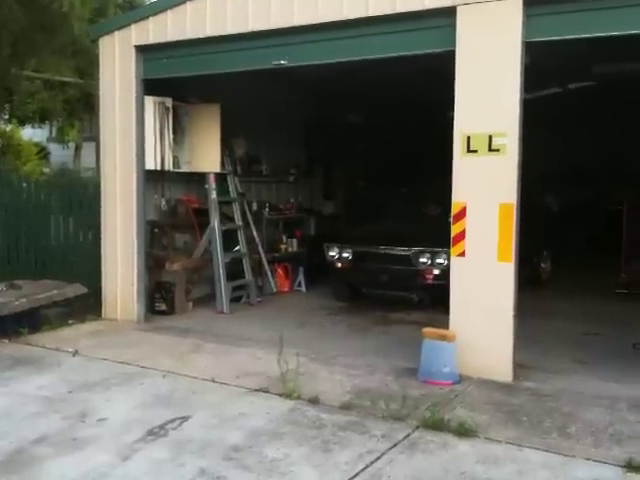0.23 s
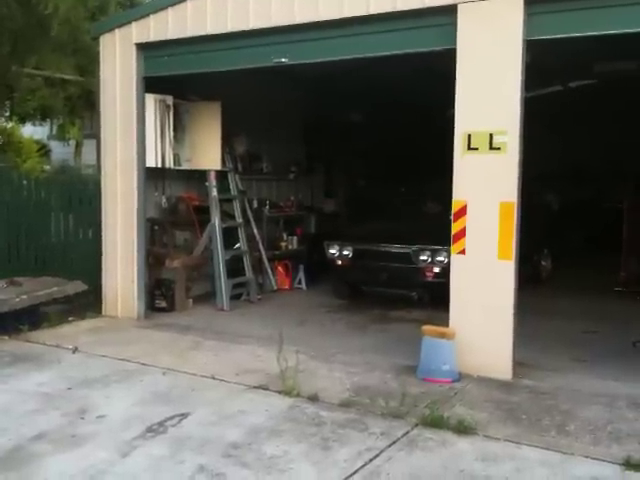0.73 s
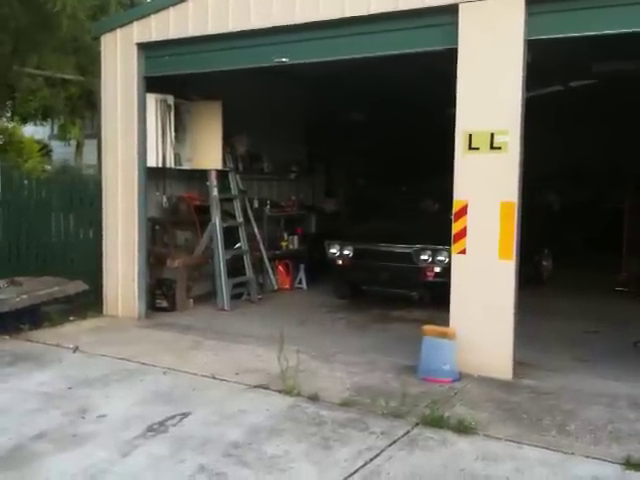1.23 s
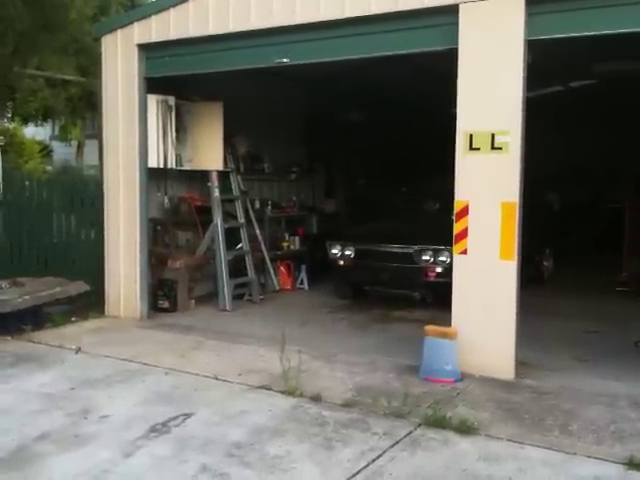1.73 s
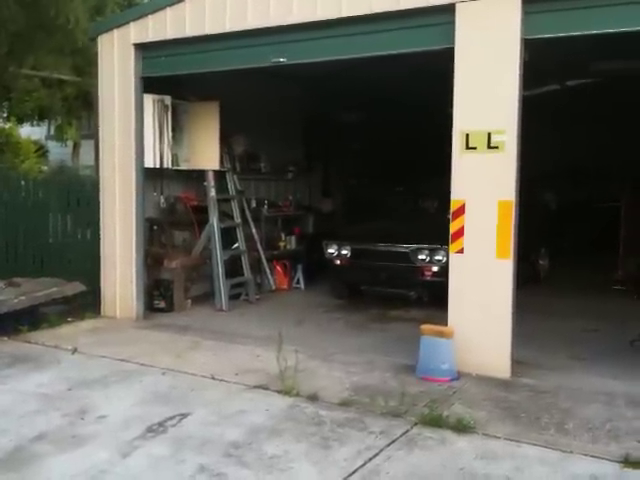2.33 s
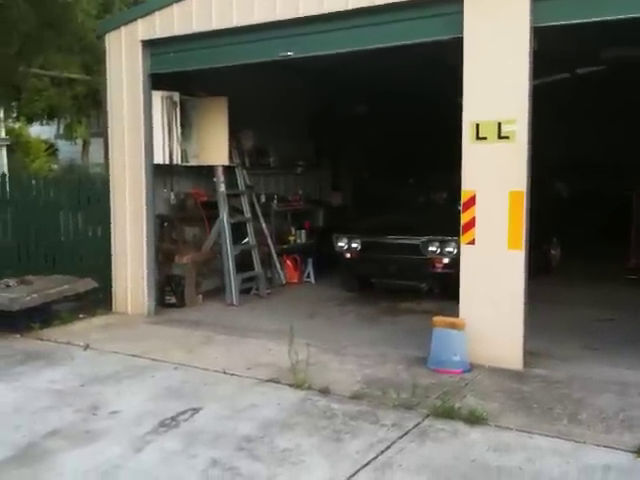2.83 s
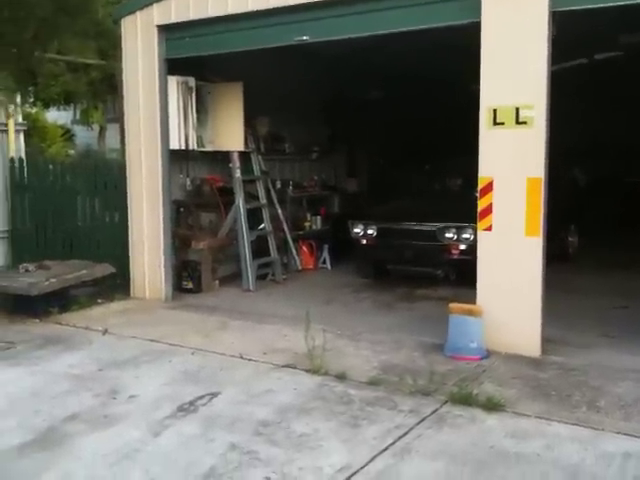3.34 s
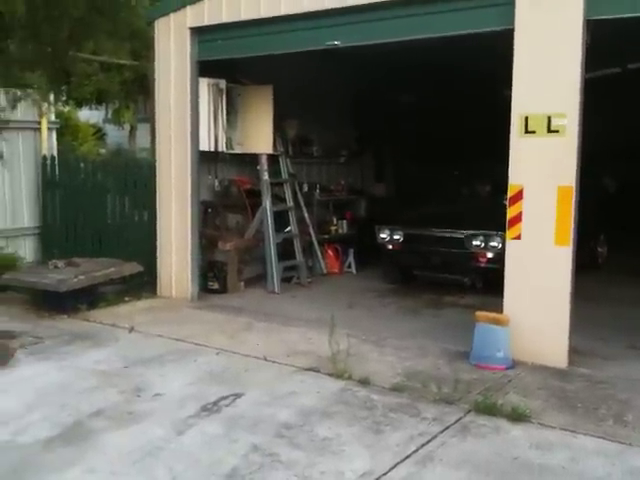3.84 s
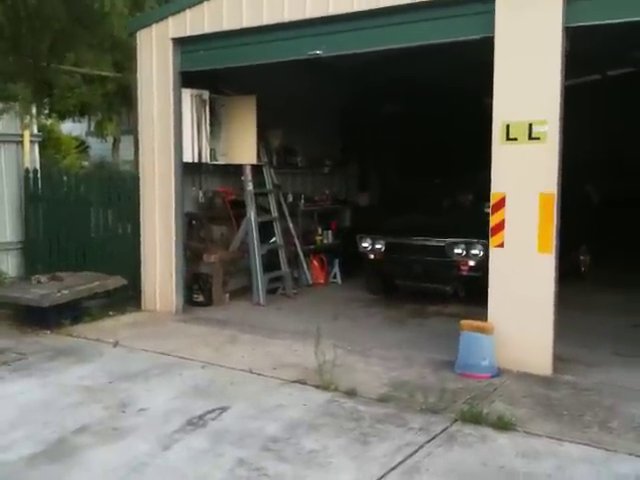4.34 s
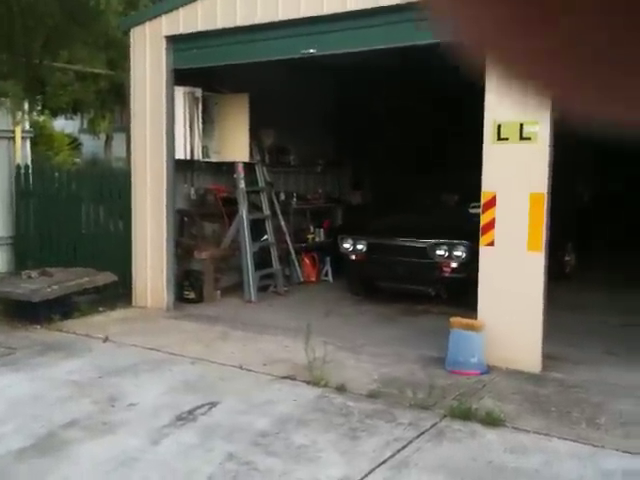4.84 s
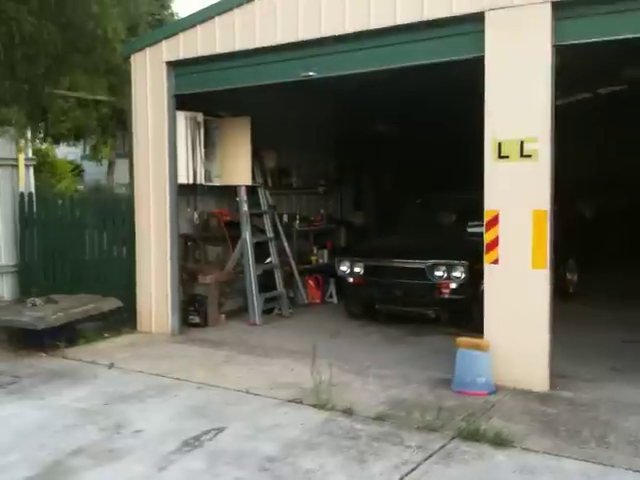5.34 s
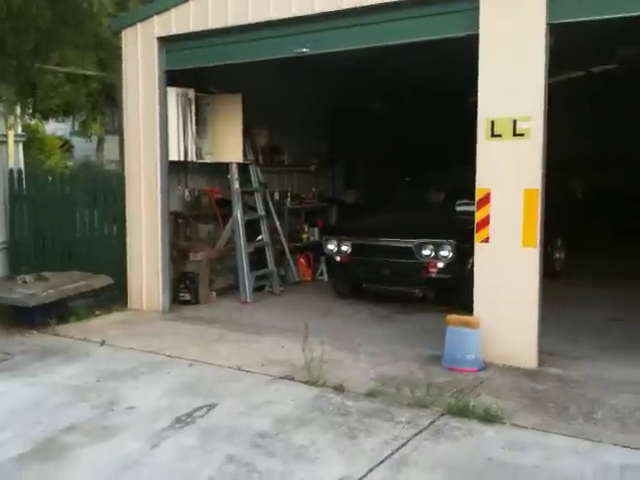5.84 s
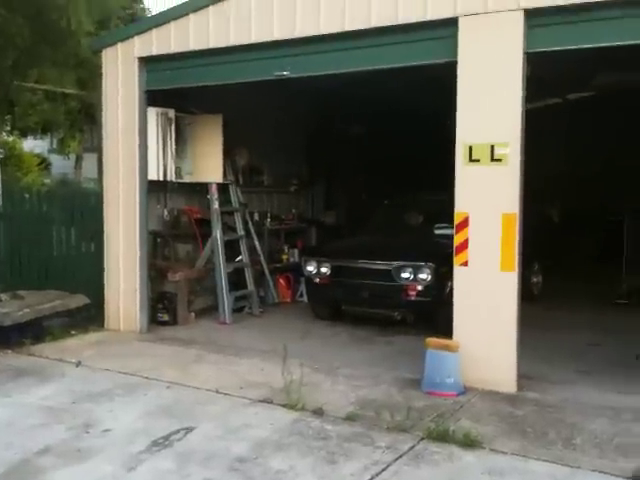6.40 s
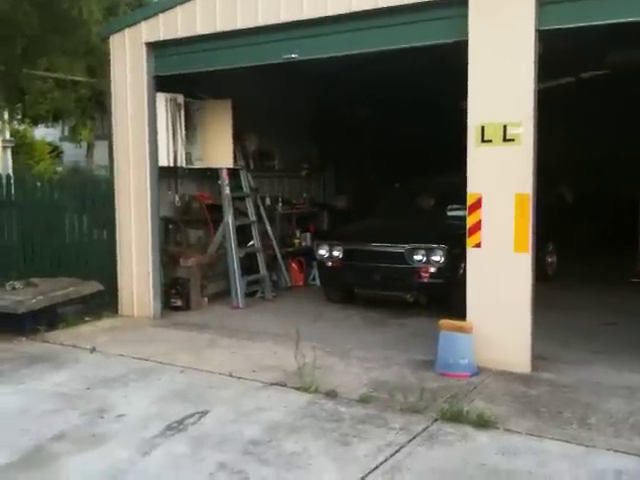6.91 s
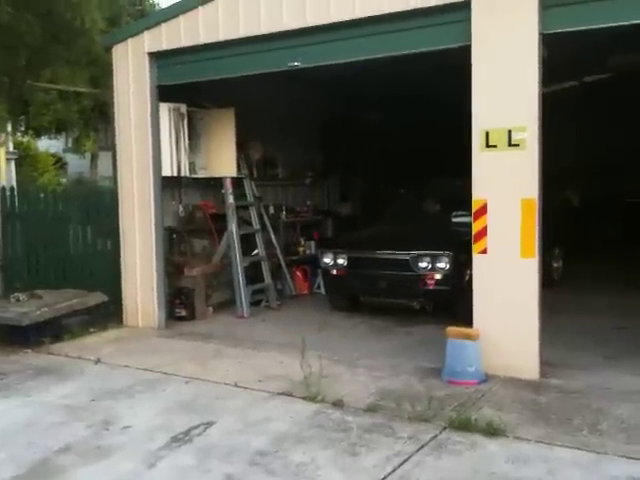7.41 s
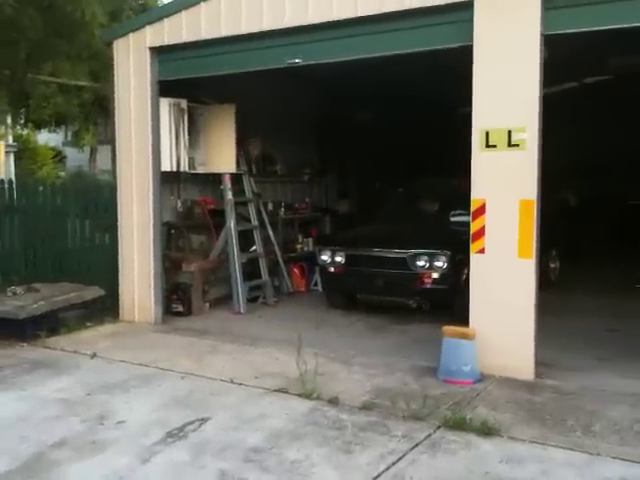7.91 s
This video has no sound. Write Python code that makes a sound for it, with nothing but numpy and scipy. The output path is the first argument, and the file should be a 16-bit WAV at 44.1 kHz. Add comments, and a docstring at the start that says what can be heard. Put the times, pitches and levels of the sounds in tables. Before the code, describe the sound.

Uneven booming exhaust pops ring off steel walls, cut out to quiet, then switch clicks, a whining starter and a harsh, rasping restart.

```python
"""A loud rotary engine idles unevenly inside a steel shed, heard from the driveway: each firing rings low exhaust modes
and sends bursts of noise round the walls, with weak misfires between. It stalls, a pump whirs with rushing noise and
unsteady tones, and small bumps are heard. A switch clicks with short noise bursts, then the starter clunks and cranks
with wavering gear partials and noise while the exhaust puffs, and the engine fires again with extra rasp.
A quiet bed of coloured noise, the yard, lies under it all."""
import sys
import numpy as np
from scipy import signal
from scipy.fft import rfft, irfft, next_fast_len
from scipy.io import wavfile
from scipy.ndimage import uniform_filter1d, map_coordinates

SR = 44100
rng = np.random.default_rng(int(sys.argv[2]) if len(sys.argv) > 2 else 0)


def natural_amplitude(level_db):
    """Convert a level in decibels to a linear amplitude factor, elementwise."""
    exponent = np.asarray(level_db, float) / 20
    return 10 ** exponent


def inscribe(sig):
    """Save sig as 16-bit PCM at rate SR to the path in sys.argv[1].

    A 1-D sig is mono; a 2-D sig holds one channel per row.
    Samples are clipped to [-1, 1] before scaling.
    """
    pcm = np.round(np.clip(np.atleast_2d(sig).T, -1, 1) * 32767)
    wavfile.write(sys.argv[1], SR, pcm.astype(np.int16))


N = 359856  # length in samples
TIME = np.arange(N) / SR  # seconds
STROKE_RATE = 8.6  # strokes a second while cranking


def unit(x):
    """Scales a sound to rms 1."""
    return x / np.sqrt(np.mean(x ** 2) + 1e-20)


def along(points, hz):
    """Reads a curve of (Hz, value) points on a log frequency axis."""
    f, value = np.transpose(points)
    return np.interp(np.log(hz + 1), np.log(f + 1), value)


def curves(rows):
    """One value per sample for each column, and a mask of the time the rows cover."""
    s, *columns = np.transpose(rows)
    covered = (TIME > s[0]) & (TIME < s[-1])
    return [np.interp(TIME, s, column) for column in columns] + [covered]


def wobble(rate):
    """A smooth random curve through a number of random knots a second."""
    knots = rng.standard_normal(int(N * rate / SR) + 4)
    return map_coordinates(knots, [np.arange(N) * rate / SR])


def coloured(x, spectrum):
    """Filters a sound by a gain curve of (Hz, dB) points."""
    m = next_fast_len(N + 8192)
    gain = natural_amplitude(along(spectrum, np.fft.rfftfreq(m, 1 / SR)))
    return irfft(rfft(x, m) * gain, m)[:N]


def noise(spectrum):
    """Steady coloured noise of rms 1."""
    return unit(coloured(rng.standard_normal(N), spectrum))


def patchy(spectrum, depth_db, size):
    """Coloured noise of rms 1 whose gain wanders in patches of size (bins, frames)."""
    z = signal.stft(rng.standard_normal(N), nperseg=1024)[2]
    field = uniform_filter1d(rng.standard_normal(z.shape), size[0], 0)
    field = uniform_filter1d(field, size[1], 1)
    uneven = signal.istft(z * natural_amplitude(depth_db * unit(field)), nperseg=1024)[1][:N]
    return unit(coloured(uneven, spectrum))


def spikes(times, db):
    """One impulse for each event."""
    return np.bincount(np.round(times * SR).astype(int), natural_amplitude(db), N)


def fading(x, t60, rise):
    """Every impulse becomes a quick rise and an exponential fall (60 dB in t60 seconds)."""
    t = np.arange(SR) / SR
    return signal.fftconvolve(x, natural_amplitude(-60 * t / t60) * (1 - np.exp(-t / rise)))[:N]


def swell(times, db, t30, rise):
    """Envelope of turbulence (falls 30 dB in t30 seconds): pulses are unrelated, so their powers add."""
    power = fading(spikes(times, 2 * db), t30, rise)
    return np.sqrt(np.abs(power))


def ringing(modes, rise):
    """Decaying sines from (Hz, amplitude, t60) rows; a negative mode starts by pulling."""
    t = np.arange(SR // 2) / SR
    sines = sum(size * natural_amplitude(-60 * t / t60) * np.sin(2 * np.pi * hz * t) for hz, size, t60 in modes)
    return (1 - np.exp(-t / rise)) * sines


def resonant(x, peaks):
    """Filters a sound by (Hz, width, dB) resonances, alternating in sign."""
    m = next_fast_len(N + SR // 2)
    f = np.fft.rfftfreq(m, 1 / SR)
    response = sum((-1) ** k * natural_amplitude(db) * 1j * f * width / (hz * hz - f * f + 1j * f * width)
                   for k, (hz, width, db) in enumerate(peaks))
    return irfft(rfft(x, m) * response, m)[:N]


# how long the shed rings on: (frequency [Hz], t60 [s])
SHED = [(100, 0.73), (200, 0.69), (1000, 0.48), (2500, 0.63), (5000, 0.74), (13000, 0.13)]


def shed(x):
    """Diffuse answer of the steel walls: a delayed noise tail, each frequency dying at its own speed."""
    hz, t, z = signal.stft(rng.standard_normal(SR), SR, nperseg=256)
    tail = signal.istft(z * natural_amplitude(-60 * t / along(SHED, hz)[:, None]), SR, nperseg=256)[1]
    delayed = np.pad(x, (500, 0))  # samples
    return signal.fftconvolve(delayed, tail / np.linalg.norm(tail))[:N]


# chambers that fire: (time [s], boom [dB], sharpness of bark and crack [dB])
FIRINGS = [(0.002, 4, -7.5), (0.057, -0.5, -13), (0.183, 3, -12), (0.214, 1.5, -17), (0.275, 1.5, -14),
           (0.305, 3, -11), (0.332, -2.5, -14.5), (0.56, 0.5, -14), (0.592, 0, -17), (0.655, -0.5, -16),
           (0.684, 3, -9), (0.711, -3, -7.5), (0.756, -9, -12.5), (0.792, 2, -12.5), (0.946, 2, -14.5),
           (1.011, 0.5, -16.5), (1.067, 0.5, -19), (1.089, 3.5, -13), (1.116, -2, -10), (1.159, 0.5, -8.5),
           (1.322, 1.5, -15.5), (1.388, -4, -15), (1.419, 0.5, -11.5), (1.447, 2, -11.5), (1.504, 0, -13.5),
           (1.662, 4, -11.5), (1.731, -0.5, -10), (1.761, -0.5, -13.5), (1.823, 1.5, -15),
           (1.884, 4, -14.5), (1.975, 3, -10.5), (2.041, 1, -10), (2.106, 3.5, -11.5), (2.138, -6.5, -13),
           (2.198, 3, -14.5), (2.259, 0.5, -15), (2.351, -3.5, -30), (2.422, -0.5, -15), (2.493, 1.5, -12),
           (2.527, -0.5, -14.5), (2.593, 0.5, -18.5), (2.657, 1.5, -14.5), (2.717, 0.5, -17),
           (2.748, 3, -9), (2.81, 2.5, -10), (2.874, 1, -15), (2.981, -2.5, -20), (3.051, 1.5, -17.5),
           (3.118, -4.5, -15), (3.149, 4, -12.5), (3.213, 1, -8.5), (3.279, -1, -15.5), (3.383, 1, -18.5),
           (3.451, -1, -16), (3.516, 1.5, -16), (3.599, 2.5, -11), (3.65, -5, -16), (3.721, 2, -15),
           (3.756, -0.5, -11), (3.861, 1.5, -19), (3.932, 3, -14), (4.004, -2.5, -16.5), (4.039, 0.5, -12),
           (4.109, 3.5, -11), (4.333, -11.5, -27), (4.382, -11.5, -17), (6.983, -23.5, -52),
           (7.051, -16, -42), (7.104, -11.5, -36.5), (7.152, -7.5, -28), (7.242, -1, -16),
           (7.355, 2.5, -19), (7.387, 2.5, -12.5), (7.449, 4.5, -13.5), (7.476, 4.5, -11),
           (7.502, -0.5, -11), (7.529, 3.5, -21), (7.553, -0.5, -13), (7.578, -0.5, -10.5),
           (7.652, -3, -28.5), (7.723, -9.5, -31), (7.79, -11, -36.5), (7.891, -13, -40.5),
           (7.924, -3.5, -24), (7.956, 0.5, -18.5), (7.991, 0.5, -15.5), (8.022, 2, -14.5), (8.081, 2, -14),
           (8.14, 0.5, -14)]
# chambers that miss and only puff: (delay after a firing [s], loss of boom [dB], loss of sharpness [dB])
MISFIRES = [(0.035, 9.4, 6.7), (0.08, 10, 17)]


def pulses():
    """Times and boom, bark and crack dB of firings, of the misfires behind them and of the cranking puffs."""
    clear_s, stall_s = 0.04, 0.3  # room a puff needs before the next firing; a longer pause is a stall
    s, boom_db, sharp_db = np.transpose(FIRINGS)
    pause = np.diff(s, append=0)
    rows = [np.array([s, boom_db, sharp_db])]
    for delay, boom_loss_db, sharp_loss_db in MISFIRES:
        chance = rng.standard_normal((len(s), 2))
        puff_s = s + delay + 0.003 * chance[:, 0]
        puff_db = boom_db - boom_loss_db + 2 * chance[:, 1]
        missed = np.array([puff_s, puff_db, sharp_db - sharp_loss_db])
        rows.append(missed[:, (pause > delay + clear_s) & (pause < stall_s)])
    crank = 6.44 + np.arange(5) / STROKE_RATE  # five puffs, one a stroke
    rows.append(np.array([crank, -29.5 + 0 * crank, -49.5 + 0 * crank]))
    s, boom_db, sharp_db = np.hstack(rows)
    scatter_db = 1.5 * rng.standard_normal(len(s))  # shifts the balance of bark and crack
    return s, boom_db, sharp_db - 0.82 + scatter_db, sharp_db + 0.63 - scatter_db


# exhaust and shed ringing after each pulse: (frequency [Hz], amplitude, t60 [s])
PIPE = [(108, .03, .5), (120, -.08, .105), (165, -.38, .108), (176, 1.2, .085), (197, -.14, .3),
        (233, .31, .19), (261, -.36, .13), (287, -.34, .066), (308, -.13, .21)]


def exhaust_boom(s, boom_db):
    """Each push of gas rings the same low modes, but no two pulses excite them alike."""
    scatter_db = 1.2 * rng.standard_normal((len(s), len(PIPE)))
    return sum(signal.fftconvolve(spikes(s, boom_db + db), ringing([mode], rise=0.0076))[:N]
               for mode, db in zip(PIPE, scatter_db.T))


# sheet-metal resonances: (frequency [Hz], width [Hz], level [dB])
PANELS = [(339, 13, -9), (438.2, 12, 4.5), (488.6, 18, -3), (627, 19, -2.5), (693.4, 26, 6), (721, 21, -3),
          (843, 6.3, -6), (864, 44, 1.5), (975, 15, -2), (1106, 46, -2), (1273, 30, -0.5), (1400, 65, -2),
          (1522, 69, -0.5), (1610, 21, 4), (1722, 27, -3), (1840, 20, 0), (1977, 7.7, -11), (2075, 30, -8),
          (2223, 18, 0), (2127, 30, -3), (2390, 30, -6), (2870, 81, -14.5)]
# colour of the lower bark: (frequency [Hz], level [dB per Hz])
BARK = [(190, -28), (330, -3), (478, -3), (567, -4.5), (693, -2), (878, 1.5), (1030, -6.5), (2170, -12),
        (3200, -26.5), (4160, -47.5), (7040, -120)]


def sheet_metal_bark(s, bark_db):
    """A sharp blast shakes the sheet metal at its resonances, over a slower burst of rough noise."""
    blast = swell(s, bark_db, t30=0.033, rise=0.00065) * rng.standard_normal(N)
    blast = blast + natural_amplitude(18.5) * spikes(s, bark_db)
    rough = swell(s, bark_db, t30=0.11, rise=0.0062) * patchy(BARK, depth_db=2.5, size=(4, 4))
    return natural_amplitude(15) * resonant(blast, PANELS) + natural_amplitude(-1.5) * rough


# colour of the gas crack: (frequency [Hz], level [dB per Hz])
CRACK = [(1410, -7), (2400, -5.5), (3160, -9.5), (3940, -6), (4800, -1), (6850, -5.5), (7710, -3.5),
         (9390, -9), (12400, -14), (15800, -23.5)]


def gas_crack(s, crack_db):
    """Spat gas makes a sudden jet of hiss, and a slower sizzle that piles up in the shed."""
    jet = natural_amplitude(-2.5 + 2.4 * wobble(400)) * swell(s, crack_db, t30=0.066, rise=0.00027) * noise(CRACK)
    sizzle = swell(s, crack_db, t30=0.25, rise=0.023) * patchy(CRACK, depth_db=2.5, size=(14, 4))
    sizzle = natural_amplitude(-1.5 + 1.4 * wobble(50)) * sizzle
    late = s > 7  # after the restart the crack carries extra rasp near 3 kHz
    rasp = noise([(2000, -30), (2600, -3), (3100, 0), (3700, -5), (4500, -30)])
    jet = jet + swell(s[late], crack_db[late] - 9.5, t30=0.12, rise=0.003) * rasp
    return jet, sizzle


def exhaust():
    """Each pulse booms, barks and cracks, straight from the exhaust and again off the shed walls."""
    s, boom_db, bark_db, crack_db = pulses()
    boom = exhaust_boom(s, boom_db)
    front = s + 0.001  # the sharp front follows the first push of gas
    bark = sheet_metal_bark(front, bark_db)
    jet, sizzle = gas_crack(front, crack_db)
    direct = natural_amplitude(1) * boom + bark + jet + sizzle
    boom_echo = natural_amplitude(-8.5) * shed(boom * natural_amplitude(4.3 * wobble(40)))
    return direct + boom_echo + natural_amplitude(-0.5) * shed(bark) + natural_amplitude(-1.5) * shed(jet)


# mean tooth rate of the gears: (time [s], rate [Hz])
GEAR = [(6.29, 422), (6.45, 452), (6.65, 482.5), (6.9, 493.5), (7.2, 505)]
# partials of the whine: (multiple of the tooth rate, level [dB])
WHINE = [(1, -10.5), (2, -3), (3, 6.5), (4, -1), (5, -5), (6, 2.5), (7, -1)]


def gear_whine(stroke, start_s):
    """Meshing teeth give wavering partials; each compression slows and loads the gears: sag and swell."""
    hz = curves(GEAR)[0] * (1 + 0.0296 * np.cos(stroke) + 0.00595 * wobble(30))
    turn = 2 * np.pi * np.cumsum(hz) / SR
    partials = sum(natural_amplitude(db + 8 * wobble(30)) * np.sin(k * turn + 0.44 * wobble(150)) for k, db in WHINE)
    load = natural_amplitude(7 * np.sin(stroke) - 6)
    since = TIME - start_s
    rise = np.clip(since / 0.1, 0, 1)
    return natural_amplitude(-45 - 9 * since) * rise * load * partials  # fades 9 dB a second as the gears unload


# pinion blows as it clunks home: (time [s], level [dB])
PINION = [(6.3, -10), (6.306, -9), (6.311, -4.5), (6.319, 5), (6.325, -5)]
# ringing of the pinion clunk: (frequency [Hz], amplitude, t60 [s])
CLUNK = [(238.5, 0.034, 0.079), (664, 0.028, 0.065), (787, 0.042, 0.051), (1437, 0.042, 0.077),
         (1720, 0.039, .05), (2140, 0.054, 0.045), (2260, 0.049, .05), (3070, 0.017, 0.037),
         (5330, 0.031, 0.033), (5480, .025, .03), (6200, .015, 0.022)]


def pinion():
    """Each blow rings the metal of the pinion and adds a short crunch of noise."""
    s, db = np.transpose(PINION)
    clunk = signal.fftconvolve(spikes(s, db), ringing(CLUNK, rise=0.0029))[:N]
    grit = noise([(500, -24.5), (1400, 6), (2400, -2), (3500, -28), (5300, 4.5), (9000, -18)])
    return clunk + swell(s, db - 27, t30=0.049, rise=0.00091) * grit


# loudness of the starter motor: (time [s], grind and chuff before a 1 dB cut [dB], drone [dB])
STARTER = [(6.29, -58, -80), (6.31, -31, -80), (6.38, -46.5, -80), (6.43, -35.5, -69.5), (6.64, -37, -59),
           (7.02, -40, -61), (7.2, -32.5, -36)]
# colour of the grind: (frequency [Hz], level [dB per Hz])
GRIND = [(200, -41), (340, -12.5), (362, -19), (482, -14.5), (763, -5), (839, -4.5), (1170, -7),
         (1390, -2.5), (1820, -9), (2930, -2.5), (7590, -11.5), (12800, -26), (15000, -36)]


def starter():
    """The pinion clunks home, then gear teeth whine over a rattling grind, chuffing air and a low drone."""
    grind_db, drone_db, on = curves(STARTER)
    stroke = 2 * np.pi * STROKE_RATE * (TIME - 6.735)  # phase in radians
    whine = gear_whine(stroke, STARTER[0][0])
    # air escaping past the rotor chuffs once a stroke
    air = noise([(3000, -25), (5000, -2), (9000, -1), (14000, -16), (16000, -40)])
    chuff = natural_amplitude(-11.5 + 6 * np.cos(stroke + 2) + 2.9 * wobble(25)) * air
    grind = patchy(GRIND, depth_db=2.5, size=(2, 6)) * natural_amplitude(1.9 * wobble(67) + 1.2 * np.cos(stroke))
    drone = noise([(60, -50), (85, -13), (105, 3.5), (125, -40)])
    drone = drone * natural_amplitude(4 * np.cos(stroke + 1.7) + 2.8 * wobble(19))
    motor = on * (whine + natural_amplitude(grind_db - 1) * (grind + chuff) + natural_amplitude(drone_db) * drone)
    dry_starter = motor + pinion()
    return dry_starter + natural_amplitude(-5) * shed(dry_starter)


# whirring after the stall: (time [s], level [dB])
PUMP = [(4.6, -46.5), (4.72, -52), (4.92, -56.5), (5.45, -56.5), (5.56, -63), (5.6, -78)]
# colour of the rushing: (frequency [Hz], level [dB per Hz])
WHIR = [(41, -46), (70, -20), (145, -4), (248, -11), (316, -4), (361, -14.5), (937, -10), (1050, -14),
        (1700, -13), (2900, -25), (5000, -19.5), (8000, -23.5), (12000, -45)]
# motor tones: (frequency [Hz], level relative to one another [dB])
HUM = [(156.1, -76), (317.6, -69), (710.6, -73), (947.5, -66), (1287, -73), (1502, -71), (1701, -72),
       (1933, -84)]


def pump():
    """A small electric motor runs on after the stall: rushing, with unsteady tones that build up."""
    level_db, on = curves(PUMP)
    tones = sum(natural_amplitude(db + 2.6 * wobble(17)) * np.sin(2 * np.pi * hz * TIME + 0.8 * wobble(9.6))
                for hz, db in HUM)
    build_up = np.clip((TIME - 4.8) / 0.22, 0, 1)
    return on * natural_amplitude(level_db) * (noise(WHIR) + natural_amplitude(-5) * build_up * unit(tones))


# small bumps after the stall: (time [s], thump [dB], knock [dB])
BUMPS = [(4.81, -62, -48), (4.835, -60, -48), (4.865, -41, -60), (4.888, -43, -62)]


def bumps():
    """Short low thumps (a brief 225 Hz sine) and dull noisy knocks, perhaps a hand on the microphone body."""
    s, thump_db, knock_db = np.transpose(BUMPS)
    t = np.arange(SR // 10) / SR
    swing = np.sin(2 * np.pi * 225 * t) * t / 0.0059 * np.exp(1 - t / 0.0048)
    thump = signal.fftconvolve(spikes(s, thump_db), swing)[:N]
    dull = noise([(250, -20), (500, 0), (1300, -3), (2000, -32)])
    return thump + swell(s, knock_db, t30=0.05, rise=0.003) * dull


# switch clicks: (time [s], level before a 0.5 dB lift of the tick [dB], thud relative to that level [dB])
CLICKS = [(6.1707, -31, -22), (6.181, -34, -2.5), (6.249, -35, -25), (6.2897, -33, -18)]


def switch():
    """Short bright ticks of white noise, each with a dull thud of its own strength behind."""
    s, db, thud_db = np.transpose(CLICKS)
    tick = fading(spikes(s, db + 0.5), t60=0.006, rise=0.0001) * rng.standard_normal(N)
    dull = noise([(120, -30), (250, 5), (1000, -1), (2500, -28)])
    return tick + fading(spikes(s, db + thud_db), t60=0.024, rise=0.001) * dull


# colour of the outdoor background: (frequency [Hz], level [dB per Hz])
YARD = [(29, -64), (50, -36.5), (107, -9.5), (200, -2.5), (613, -9), (1930, -11.5), (3260, -18.5),
        (4890, -12), (13000, -25.5), (15000, -22.5)]


def yard():
    """Outdoor background: quiet coloured noise around -62 dB that drifts slightly in level."""
    return natural_amplitude(-62 + 1.2 * wobble(3.7)) * noise(YARD)


def scene():
    """Everything at the microphone, in one channel."""
    return (exhaust() + starter() + pump() + bumps() + switch() + yard())[None]


def low_pass(x):
    """Removes everything above the highest recorded frequency."""
    return signal.sosfilt(signal.butter(12, 16620, fs=SR, output="sos"), x)


def record(dry):
    """The small microphone loses the bass and the top and overloads softly on the booms."""
    x = coloured(dry[0], [(20, -23), (60, -33.5), (100, -1), (15600, -2.5), (15900, -60)])
    x = x / (1 + np.abs(x / 0.76) ** 4) ** (1 / 4)  # peaks flatten towards 0.76
    mix = coloured(x, [(15700, 0), (15900, -30.5)])[None]  # trims the top again after the overload
    return low_pass(mix)


dry = scene()
out = record(dry)
inscribe(out)
```